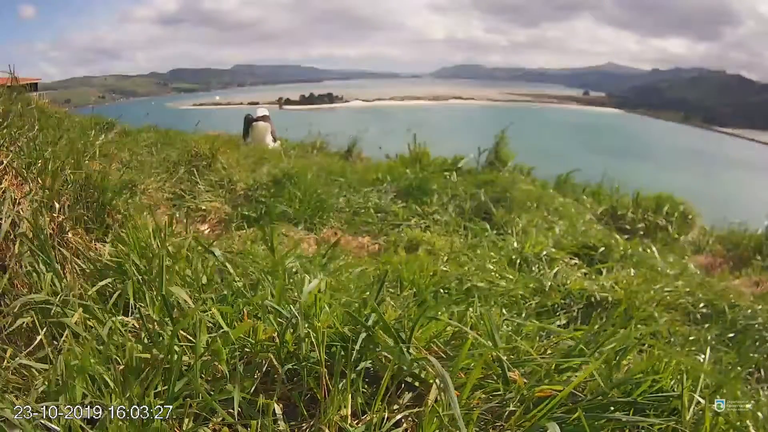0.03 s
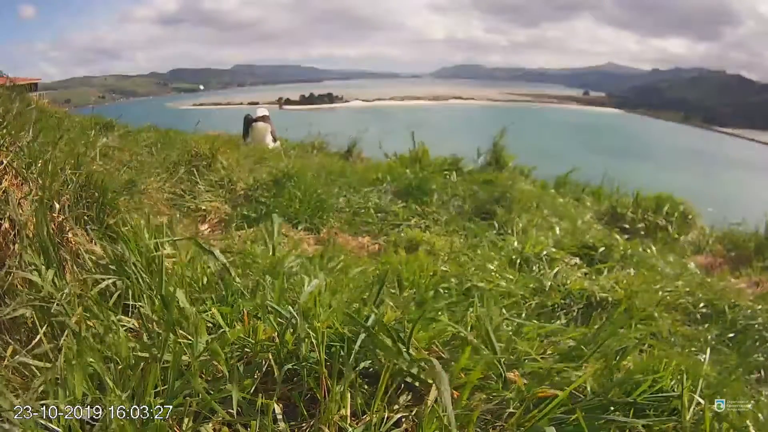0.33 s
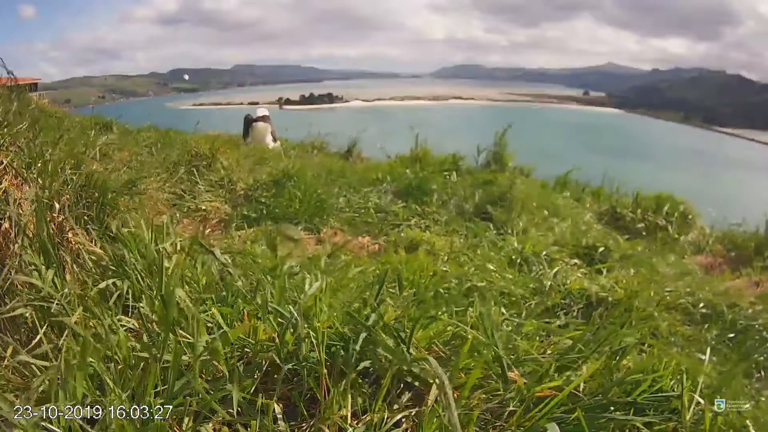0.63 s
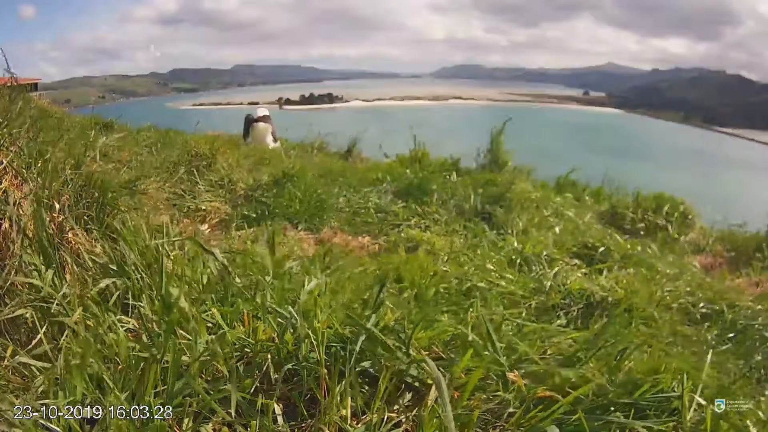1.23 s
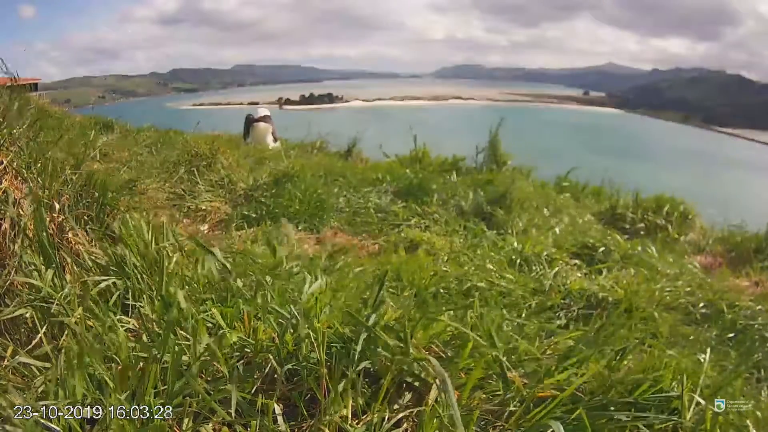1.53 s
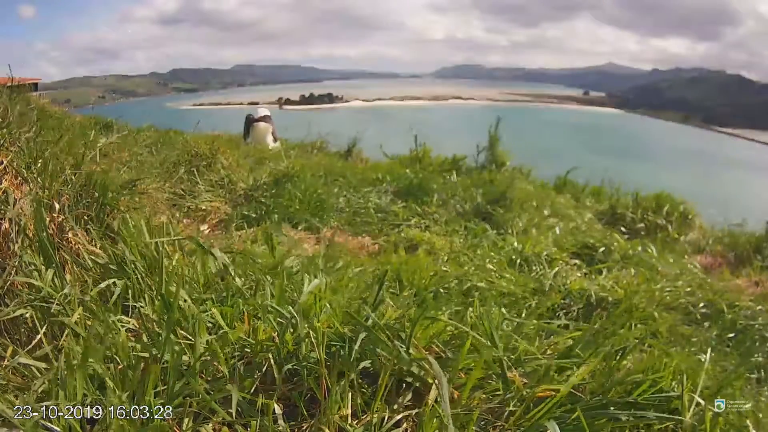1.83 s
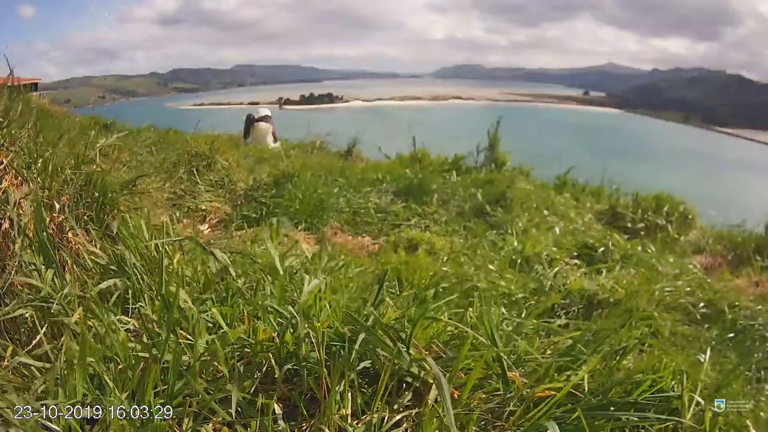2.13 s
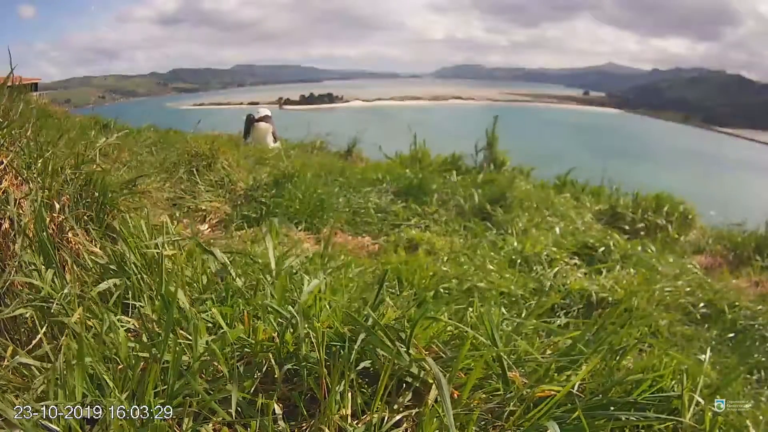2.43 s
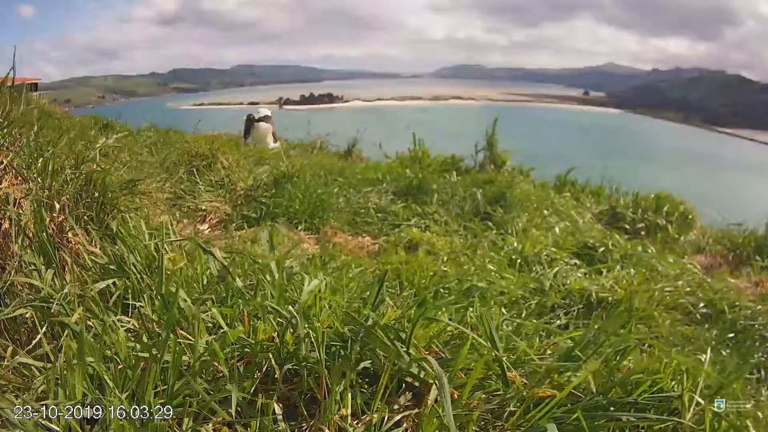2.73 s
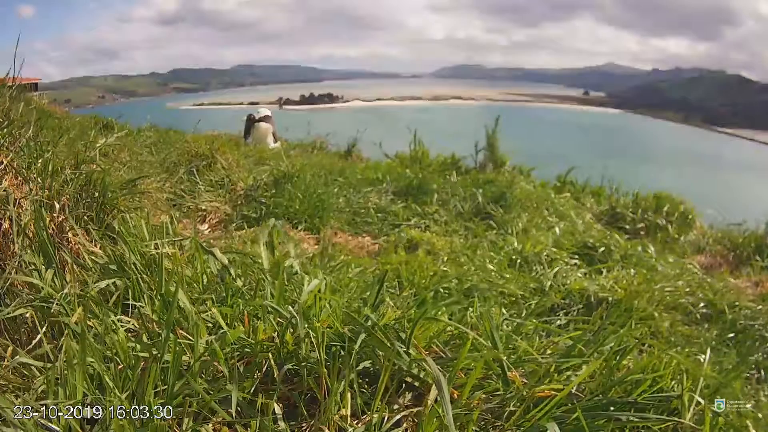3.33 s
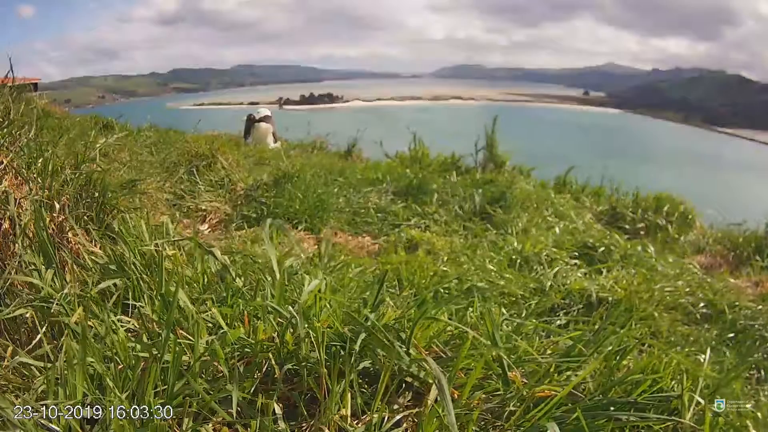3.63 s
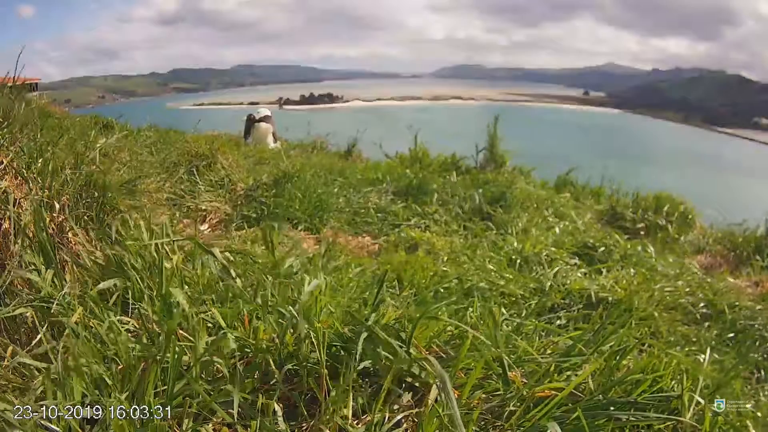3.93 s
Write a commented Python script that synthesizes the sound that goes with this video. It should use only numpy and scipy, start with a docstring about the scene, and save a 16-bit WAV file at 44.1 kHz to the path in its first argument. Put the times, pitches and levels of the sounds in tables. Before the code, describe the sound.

A nearby seabird calls in raspy honks, pauses while wind thumps and hisses on the microphone, then whines, yelps and honks again, ending on a drawn-out whine. A distant engine hums low beneath the open coastal hillside.

```python
"""A grassy headland, the microphone out in the wind, a seabird near and an engine far off.
The bird opens with harsh honks and small squeaks, then gusts buffet the microphone and hiss past it.
Near 2 s a hoarse whine breaks into two yelps; two honks, two faint squeaks and a long whine follow.
The voice is a reedy tone near 1.1 kHz, chopped by a beat of about 85 a second; both sink as the
effort fades. The engine drones underneath throughout."""
import sys
import numpy as np
from scipy import signal
from scipy.fft import rfft, irfft, next_fast_len
from scipy.io import wavfile
from scipy.ndimage import map_coordinates

SR = 44100
rng = np.random.default_rng(int(sys.argv[2]) if len(sys.argv) > 2 else 0)


def store_wav(level_fs):
    """Save 16-bit WAV to argv[1]."""
    pcm = np.round(np.clip(np.atleast_2d(level_fs), -1, 1) * 32767)
    wavfile.write(sys.argv[1], SR, pcm.T.astype(np.int16))


N = 176400

# Air hissing past the microphone. Each row: frequency in Hz, relative density in dB.
HISS_SPECTRUM = [(200, 1), (900, 3.5), (2000, -1), (4000, -2.5), (6000, -6), (7700, -8.5)]


def amp(db):
    """Decibels to gain."""
    return 10 ** (np.asarray(db) / 20)


def along(points, hz):
    """Read (Hz, value) points on a log axis."""
    f, v = np.transpose(points)
    return np.interp(np.log(hz + 1), np.log(f + 1), v)


def curves(rows, t):
    """Each column after the time, read at times t."""
    times, *columns = np.transpose(rows)
    return [np.interp(t, times, column) for column in columns]


def wobble(rate, t):
    """A smooth random curve with rate knots a second."""
    knots = np.random.default_rng(rng.integers(2 ** 31)).standard_normal(int((t[-1] - t[0]) * rate) + 4)
    return map_coordinates(knots, [(t - t[0]) * rate], mode="nearest")


def filtered(x, response):
    """Weight the spectrum of x by a response of frequency."""
    size = next_fast_len(N + SR // 2)
    return irfft(rfft(x, size) * response(np.fft.rfftfreq(size, 1 / SR)), size)[:N]


def noise(spectrum):
    """Coloured noise of rms 1."""
    x = filtered(rng.standard_normal(N), lambda hz: amp(along(spectrum, hz)))
    return x / np.sqrt(np.mean(x ** 2) + 1e-20)


def voice(t, pitch, beats, colour_db, jitter, rasp_db, open_share):
    """The bird's reedy tone starts afresh at every beat with a puff, scoops up to pitch and shuts."""
    # The throat's response. Each row: frequency in Hz, gain in dB.
    throat = [(500, -40.5), (1100, -22), (1300, -18.5), (1600, 6), (2100, -6.5), (2550, -5), (3100, -3),
              (3800, -10.5), (4400, -12.5), (4800, -19), (5400, -14.5), (6200, -32.5), (7500, -45)]
    # Rasp in the voice. Each row: frequency in Hz, relative density in dB.
    rasp_spectrum = [(400, -13), (900, -16.5), (1600, 7.5), (2500, -4), (3400, 9), (4400, -15.5),
                     (5600, -41.5), (7500, -38)]
    longest_open_s, attack_s, release_s = 0.014, 0.0044, 0.0041
    scoop_s, droop_s, glide_per_s = 0.0013, 0.0016, 3.9
    puff_db, puff_s, flutter_db = 1.5, 0.00039, 1.1
    n = np.arange(len(t))
    new_beat = np.diff(np.floor(beats), prepend=np.floor(beats[0])) > 0
    opened = np.maximum.accumulate(np.where(new_beat, n, 0))  # first sample of the current beat
    age = (n - opened) / SR
    left = np.minimum(open_share / np.gradient(beats, t), longest_open_s) - age
    attack = np.sin(np.pi / 2 * np.clip(age / attack_s, 0, 1))
    gate = attack * np.sin(np.pi / 2 * np.clip(left / release_s, 0, 1)) ** 2
    centre_hz = pitch[np.minimum(opened + int(longest_open_s * SR / 2), len(t) - 1)]  # one per beat
    # Each beat starts flat, climbs, and goes flat again as it shuts.
    scoop = 0.094 * np.exp(-age / scoop_s)
    glide = glide_per_s * (age - left) / 2
    droop = 0.072 * np.exp(-np.maximum(left, 0) / droop_s)
    cycles = np.cumsum(centre_hz * (1 + glide - scoop - droop) * (1 + jitter * wobble(689, t))) / SR
    phase = 2 * np.pi * (cycles - cycles[opened])
    tone = np.zeros(len(t))
    for k in range(1, 8):
        partial_db = along(throat, k * centre_hz) + colour_db(k * centre_hz)
        tone += amp(partial_db + flutter_db * wobble(90.6, t)) * np.sin(k * phase)
    puff = amp(puff_db) * np.exp(-age / puff_s)
    rasp = amp(rasp_db) * noise(rasp_spectrum)[:len(t)]
    return gate * tone + rasp * (gate + puff)


def beak(hz, peak_db, centre_hz, width_hz):
    """One resonance of the beak, in dB."""
    return peak_db / (1 + ((hz - centre_hz) / width_hz) ** 2)


def treble_tilt(hz, db_per_octave):
    """The voice's slope above 2500 Hz, in dB."""
    return db_per_octave * np.log2(np.maximum(hz / 2500, 1))


def honks():
    """Effort swells to a crest and fades; pitch and beat sag with it and the voice turns to a rattle."""
    # Honks and squeaks. Each row: crest in seconds, top pitch in Hz, level ahead of the throat in dB,
    # rise and fall in seconds, top beat in Hz, low and high beak resonance in dB, the high one's
    # frequency in Hz, rattle below the crest in dB, greatest open share of a beat.
    calls = [ (0.317, 1320, -55, 0.024, .018, 92, -14, 18, 3700, 33, 0.71),
             (0.3596, 1076, -49, 0.032, 0.03, 85, 5.5, 0.5, 3250, 34.5, 0.98),
             (0.441, 1250, -54, 0.018, 0.018, 84.3, -17, 4.5, 3800, 24, 0.93),
             (0.494, 1085, -46.5, 0.029, 0.039, 86.7, 7, 7, 3270, 31, 0.9),
             (0.6448, 1024, -47.5, .037, 0.027, 82.5, 6, 4.5, 3100, 36, 0.85),
             (2.6152, 1117, -42.5, 0.025, 0.032, 87.6, -3, 15.5, 3416, 30.5, 0.92),
             (2.7556, 1122, -43, 0.033, 0.037, 88.2, -4, 15.5, 3425, 33, 0.97),
             (3.103, 1404, -72.5, .030, 0.033, 85.8, -3, 0, 3380, 28.5, .99),
             (3.226, 1374, -83.5, 0.028, .036, 85.3, 21, 10, 3330, 23, .99)]
    pitch_sag, rattle_tilt_db = 0.28, -38
    out = np.zeros(N)
    for crest, top_hz, db, rise, fall, beat_hz, low_db, high_db, high_hz, fade_db, open_share in calls:
        span = np.arange(max(0, int((crest - 0.12) * SR)), min(N, int((crest + 0.16) * SR)))
        t = span / SR
        rising = t < crest
        away = np.abs(t - crest) / np.where(rising, rise, fall)
        slack = 1 - 1 / (1 + away ** 4)  # 0 at the crest, 1 in the rattle
        sag = 1 - pitch_sag * (1 - np.exp(-(away / 0.9) ** 2.9))
        # The beat slows more than the pitch as a honk dies.
        beats = np.cumsum(beat_hz * sag ** np.where(rising, 0.85, 2.2)) / SR
        beats -= np.interp(crest, t, beats)  # a beat opens on the crest

        def colour_db(hz):
            """The beak rings at the crest; the rattle is dull."""
            ring = beak(hz, low_db, centre_hz=2124, width_hz=320) + beak(hz, high_db, high_hz, 170)
            return (1 - slack) * ring + slack * treble_tilt(hz, rattle_tilt_db)

        reach = np.where(rising, 1.27, 2.4)  # of the rattle, in rise and fall times
        level = amp(db - fade_db * slack) / (1 + (away / reach) ** 8)
        jitter, rasp_db = 0.0038 + 0.06 * slack, -13 + 10 * slack
        out[span] += level * voice(t, top_hz * sag, beats, colour_db, jitter, rasp_db, open_share)
    return out


def whine(rows, rasp_db, beak_db):
    """The same voice held softly at a higher pitch; where the tone fails, air wheezes through."""
    # Air through the throat. Each row: frequency in Hz, relative density in dB.
    wheeze_spectrum = [(800, -30.5), (1500, 0), (1900, -11), (2400, 6), (2800, -4), (3400, -8), (4200, -3),
                       (5000, -27.5), (7000, -25.5)]
    span = np.arange(int(rows[0][0] * SR), min(N, int(rows[-1][0] * SR)))
    t, out = span / SR, np.zeros(N)
    pitch, db, beat_hz, tilt_db, jitter, wheeze_db = curves(rows, t)
    colour_db = lambda hz: treble_tilt(hz, tilt_db) + beak(hz, beak_db, centre_hz=3810, width_hz=470)
    beats = np.cumsum(beat_hz * (1 + 0.015 * wobble(66, t))) / SR
    pulsing = 1 - 0.19 * np.cos(2 * np.pi * beats)
    wheeze = amp(wheeze_db) * pulsing * noise(wheeze_spectrum)[span]
    tone = amp(db) * voice(t, pitch, beats, colour_db, jitter, rasp_db, open_share=0.9)
    out[span] = signal.windows.tukey(len(span), 0.04) * (tone + wheeze)
    return out


def high_calls():
    """A hoarse whine breaks into two yelps; a long clear whine comes last."""
    # The course of each call. Each row: time in seconds, pitch in Hz, level ahead of the throat in dB,
    # beat in Hz, treble tilt in dB per octave, jitter as a share of pitch, wheeze in dB.
    hoarse = [(1.943, 780, -95, 61.6, 7, .05, -83), (1.963, 1246, -61, 67.8, -24, .008, -83),
              (1.98, 1260, -58, 82.7, -26, .008, -85), (1.995, 1316, -60, 82.9, -18, 0.012, -84),
              (2.008, 1340, -64, 89.1, -5, .04, -83), (2.065, 1430, -68, 92.6, -11, .05, -74.5),
              (2.125, 1270, -62, 91.6, -17, 0.082, -72), (2.16, 1406, -71, 84, 13, .04, -76),
              (2.188, 1450, -60, 76, 3, .04, -79)]
    yelps = [(2.185, 1407, -66, 81.7, -2, .05, -74), (2.203, 1280, -58, 86, 5, 0.014, -64.5),
             (2.215, 1307, -56, 85, -3, .012, -67.5), (2.227, 1257, -59, 80.2, -2, 0.029, -72),
             (2.24, 1046, -63, 67.7, -4, 0.036, -70), (2.258, 920, -74, 63, -5, 0.028, -86),
             (2.285, 962, -72.5, 58, -2, 0.035, -84), (2.318, 1006, -72.5, 72, -2, 0.026, -87),
             (2.333, 1134, -60.5, 77.4, -2, .04, -72), (2.352, 1223, -61.5, 84, -7, .03, -75.5),
             (2.37, 1073, -57.5, 69.3, -23, 0.021, -80), (2.39, 950, -92, 59, 5, .06, -90)]
    clear = [(3.521, 744, -87, 66.3, 7, 0.035, -66), (3.543, 1208, -53.5, 70.1, -16, 0.014, -76),
             (3.557, 1249, -51.5, 75, -6, 0.0099, -76), (3.595, 1308, -70.5, 69.8, 1, .035, -76),
             (3.63, 1286, -58.5, 74.2, 7.5, 0.0089, -80), (3.685, 1260, -57.5, 76.1, 5, 0.011, -77),
             (3.722, 1246, -51, 76.5, -3.5, 0.015, -89), (3.75, 1253, -58.5, 66, 5, 0.019, -78),
             (3.78, 1210, -58, 68.7, 1.5, 0.018, -83.5), (3.84, 1140, -67.5, 64.8, -11, .025, -80.5),
             (3.872, 1145, -61, 66.8, -5, .018, -83), (3.90, 1060, -67.5, 59.6, -8, .025, -87),
             (3.915, 779, -80, 55.3, -19, .03, -96), (3.93, 760, -92, 55, -16, .06, -86)]
    return (whine(hoarse, rasp_db=-19, beak_db=-9)
            + whine(yelps, rasp_db=-22, beak_db=10)
            + whine(clear, rasp_db=-26, beak_db=1))


def hillside(x, wet_db=-26, t60=0.12):
    """The direct sound reaches the microphone with a faint scatter from the slope."""
    t = np.arange(SR // 2) / SR
    tail = rng.standard_normal(len(t)) * amp(-60 * t / t60)
    return x + amp(wet_db) * signal.fftconvolve(x, tail / np.linalg.norm(tail))[:N]


def wind(t):
    """Wind buffets the microphone and rushes over the grass; its hiss is smooth in lulls, spits in gusts."""
    # The swell of each layer. Each row: time in seconds, relative level in dB.
    buffet_levels = [(0.0, -38.5), (0.07, -42), (0.24, -33.5), (0.58, -52.5), (.76, -46), (0.92, -36.5),
                     (1.06, -42.5), (1.27, -40.5), (1.36, -39.5), (1.42, -39.5), (1.74, -37), (2.0, -46),
                     (2.24, -47.5), (2.55, -52), (2.83, -49.5), (3.09, -54.5), (3.68, -59.5), (4.0, -46)]
    rush_levels = [(0, -73.5), (.13, -63.5), (.23, -70.5), (.38, -68), (.75, -64.5), (.84, -56), (1.0, -54),
                   (1.08, -59.5), (1.18, -53.5), (1.28, -55), (1.38, -63), (1.72, -59), (1.93, -70),
                   (2.2, -63.5), (2.52, -71), (2.72, -61.5), (3.15, -72), (3.6, -70), (4, -65.5)]
    whoosh_levels = [(0, -71.5), (.25, -72), (.45, -73.5), (.75, -72.5), (.95, -63.5), (1.08, -67.5),
                     (1.25, -60.5), (1.38, -71.5), (1.55, -68), (1.72, -67.5), (1.95, -76.5), (2.5, -74.5),
                     (2.75, -72.5), (3.2, -78.5), (4, -77)]
    hiss_levels = [(0, -73), (.3, -72.5), (.45, -75.5), (.72, -77), (.9, -76.5), (1.1, -73), (1.3, -75),
                   (1.75, -77.5), (1.95, -76.5), (2.5, -79.5), (2.85, -78), (3.1, -82), (3.45, -83),
                   (3.75, -78.5), (4, -78.5)]
    # Deep buffet, low rush, midrange whoosh. Each row: frequency in Hz, relative density in dB.
    buffet_spectrum = [(2, -6), (8, 4.5), (16, 8.5), (30, -8), (55, -9.5), (100, -20.5), (200, -32),
                       (500, -40), (2000, -89)]
    rush_spectrum = [(40, 5), (130, 2.5), (280, -1.5), (450, -7.5), (800, -41), (2000, -49.5)]
    whoosh_spectrum = [(150, -15), (400, -3.5), (750, -4), (1300, -18.5), (2200, -21), (4000, -30),
                       (7000, -39.5)]
    calm_db, gusty_db, spit_depth_db = -86, -71, 14
    buffet = amp(curves(buffet_levels, t)[0] + 3) * noise(buffet_spectrum)
    rush = amp(curves(rush_levels, t)[0] + 2) * noise(rush_spectrum)
    hiss_db = curves(hiss_levels, t)[0]
    gustiness = np.clip((hiss_db - calm_db) / (gusty_db - calm_db), 0, 1)
    spit_db = spit_depth_db * gustiness * np.tanh((wobble(55.62, t) + wobble(170, t)) / 2)
    whoosh = amp(curves(whoosh_levels, t)[0]) * noise(whoosh_spectrum)
    hiss = amp(hiss_db - 1 + spit_db) * noise(HISS_SPECTRUM)
    return buffet + rush + whoosh + hiss


def gusts(t):
    """Each eddy that hits the microphone gives a low thump and a spit of hiss."""
    # Single eddies. Each row: peak in seconds, half length in seconds, thump in dB, spit in dB.
    eddies = [(.10, 0.026, -62, -68), (0.23, 0.017, -47, -67.5), (0.317, .035, -56, -66.5),
              (0.873, 0.018, -47.5, -71), (0.927, 0.0067, -40.5, -68), (1.013, .02, -44.5, -76.5),
              (1.213, 0.014, -40, -76.5), (1.278, 0.0088, -41, -68), (1.311, 0.013, -49, -66),
              (1.402, 0.011, -51, -67.5), (1.504, 0.0094, -44, -65.5), (1.57, 0.0095, -55, -65.5),
              (1.665, .014, -43.5, -73), (1.721, 0.01, -40.5, -66.5), (1.766, 0.014, -48.5, -65.5),
              (2.84, 0.025, -53.5, -76), (2.975, .05, -59, -81)]
    # The thump. Each row: frequency in Hz, relative density in dB.
    thump_spectrum = [(20, 3), (50, 3.5), (100, 2), (200, -11), (400, -16), (800, -33), (2000, -57)]
    thump, spit = noise(thump_spectrum), noise(HISS_SPECTRUM)
    return sum(np.exp(-((t - peak) / half) ** 2) * (amp(thump_db) * thump + amp(spit_db) * spit)
               for peak, half, thump_db, spit_db in eddies)


def engine(t, turn_hz=44.3):
    """A far engine drones, its orders fading in and out on the wind."""
    # The drone at the microphone. Each row: time in seconds, then orders 2, 3 and 4 in dB.
    orders = [(0, -68, -75.5, -75.5), (.65, -57, -66.5, -73), (1.5, -56.5, -78, -62.5),
              (2.2, -66, -68, -61), (2.7, -59.5, -72.5, -62.5), (3.05, -61, -68, -67.5),
              (3.25, -77.5, -76.5, -78.5), (3.52, -79.5, -65, -72), (4, -71.5, -71.5, -61.5)]
    phase = 2 * np.pi * np.cumsum(turn_hz * (1 + 0.009 * wobble(10, t))) / SR
    return sum(amp(db + 1.7 * wobble(12, t)) * np.sin(k * phase)
               for k, db in enumerate(curves(orders, t), 2))


def scene():
    """One microphone on the headland: the bird in front, wind all round, the engine far behind."""
    t = np.arange(N) / SR
    bird = honks() + high_calls()
    return (hillside(bird) + wind(t) + gusts(t) + engine(t))[None]


def record(dry, top_hz=7750):
    """The camera keeps nothing above its band limit."""
    return filtered(dry[0], lambda hz: hz < top_hz)[None]


dry = scene()
out = record(dry)
store_wav(out)
```